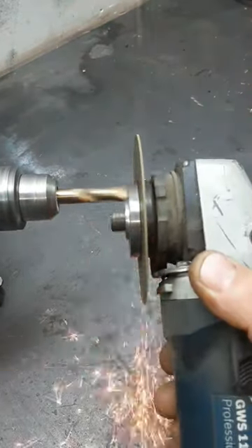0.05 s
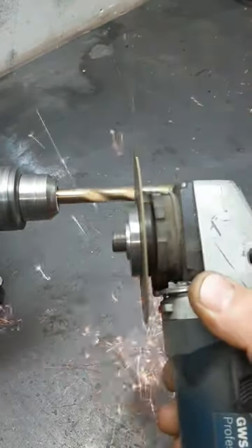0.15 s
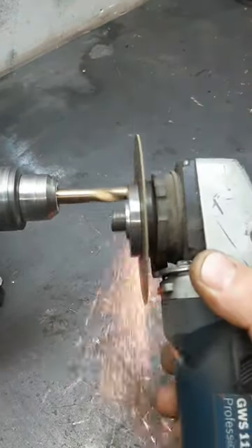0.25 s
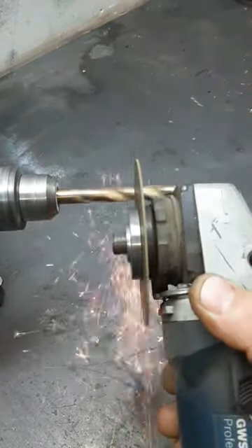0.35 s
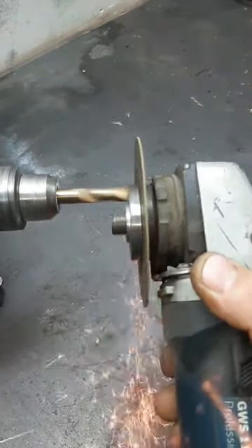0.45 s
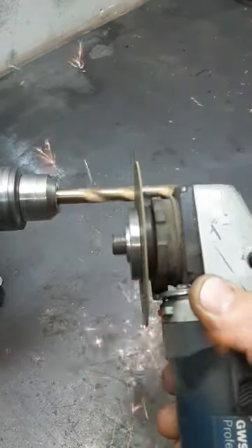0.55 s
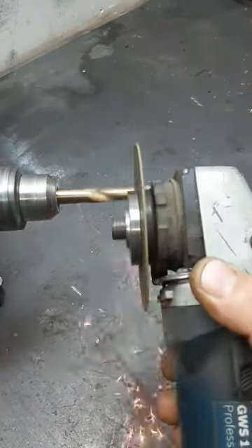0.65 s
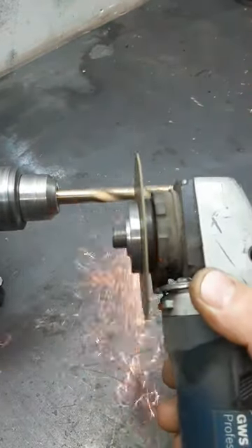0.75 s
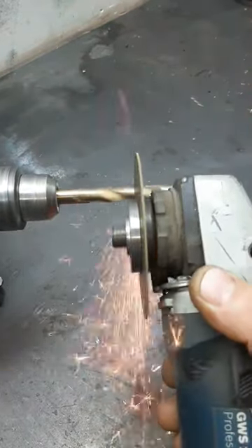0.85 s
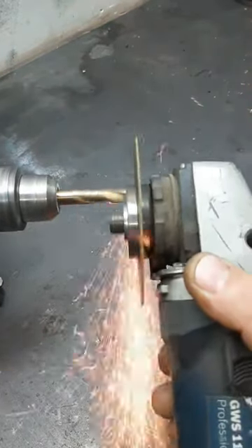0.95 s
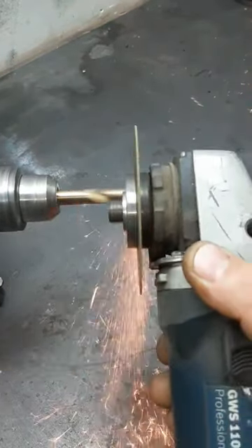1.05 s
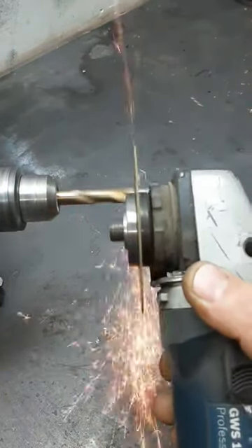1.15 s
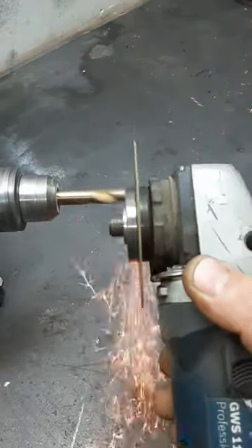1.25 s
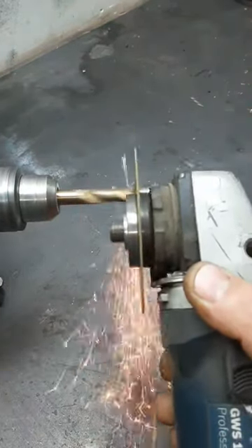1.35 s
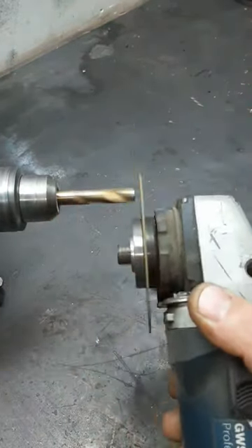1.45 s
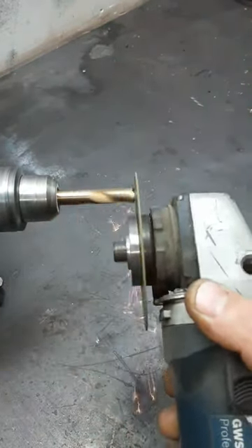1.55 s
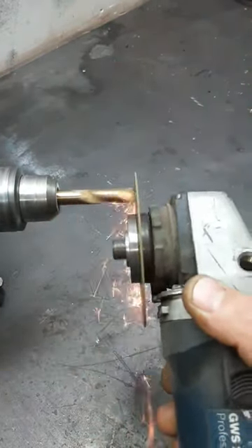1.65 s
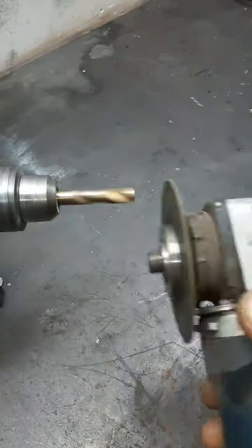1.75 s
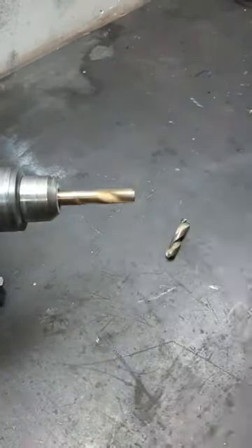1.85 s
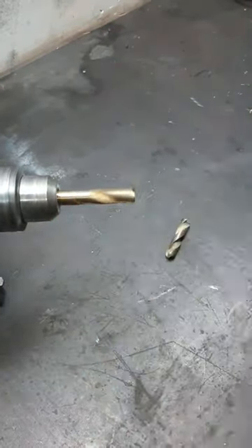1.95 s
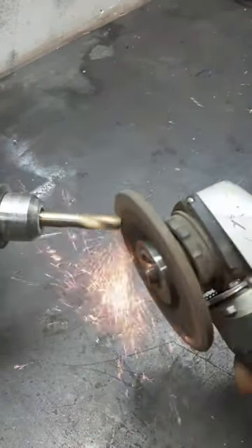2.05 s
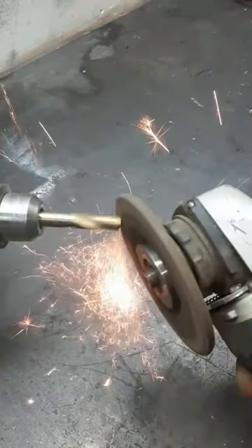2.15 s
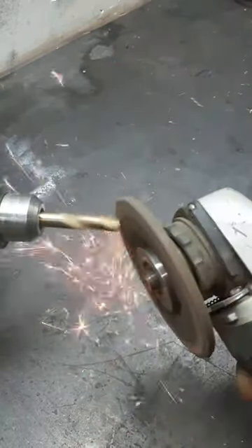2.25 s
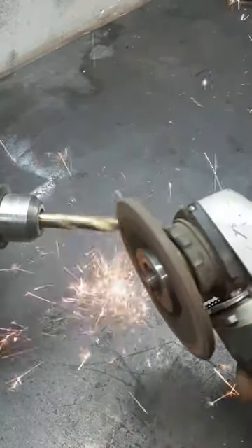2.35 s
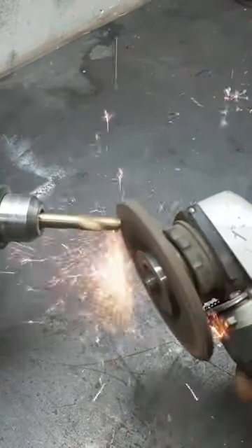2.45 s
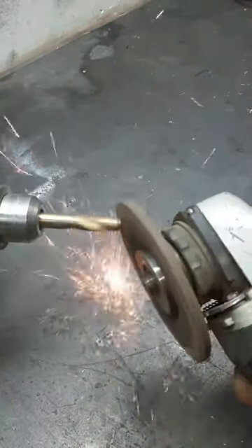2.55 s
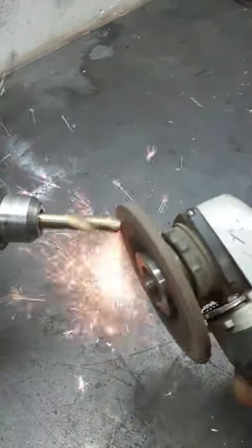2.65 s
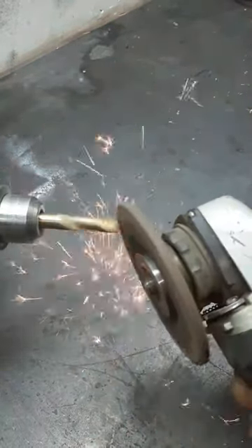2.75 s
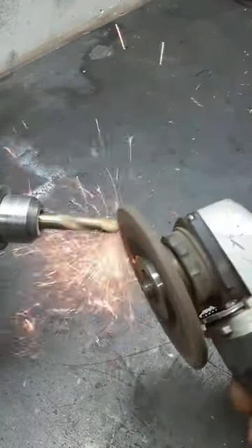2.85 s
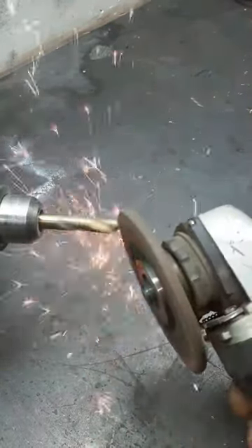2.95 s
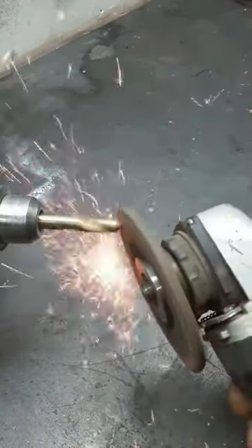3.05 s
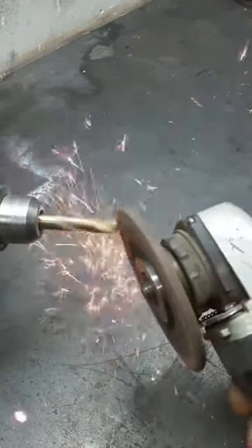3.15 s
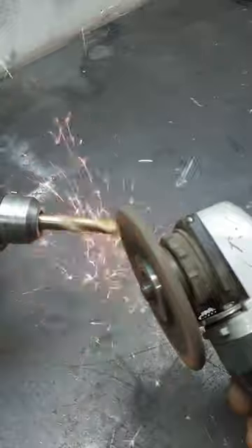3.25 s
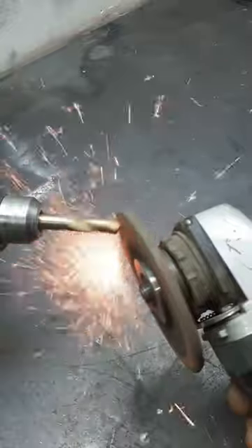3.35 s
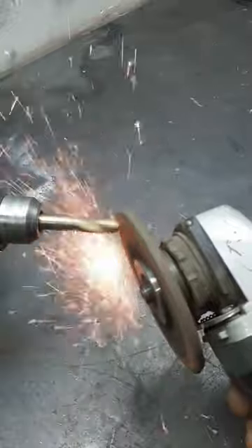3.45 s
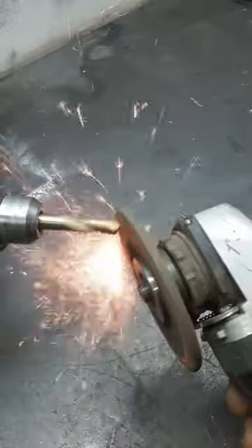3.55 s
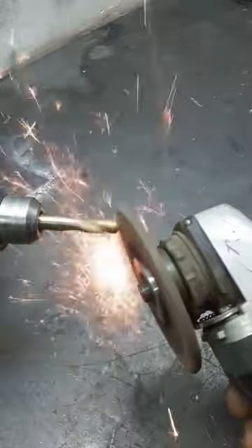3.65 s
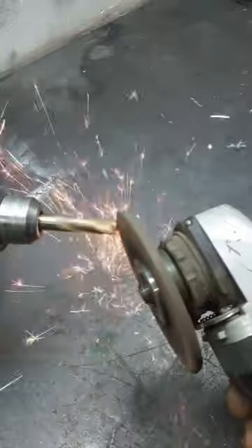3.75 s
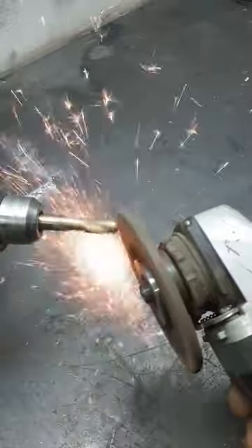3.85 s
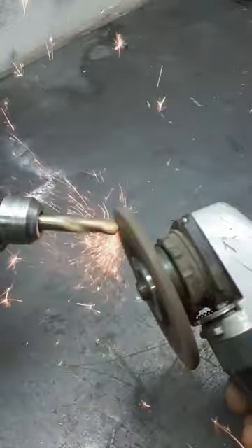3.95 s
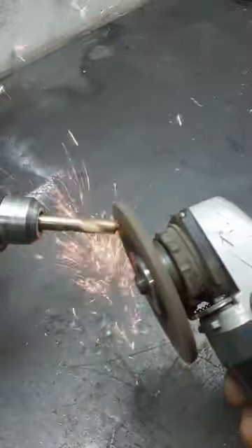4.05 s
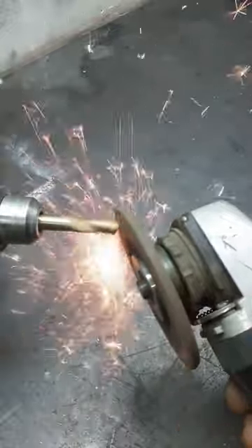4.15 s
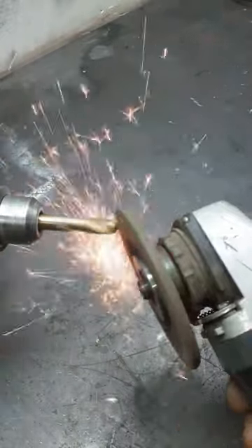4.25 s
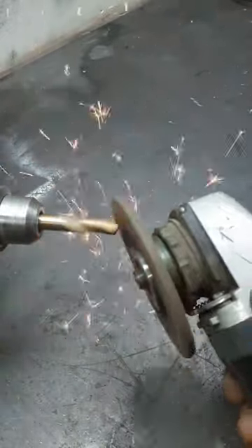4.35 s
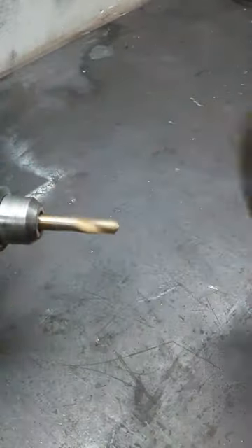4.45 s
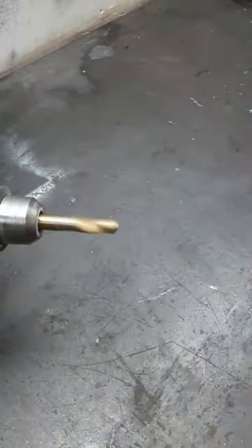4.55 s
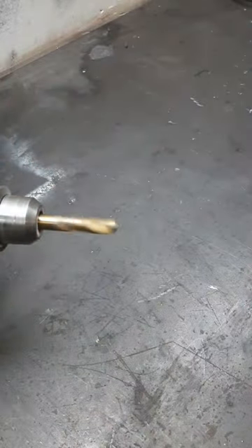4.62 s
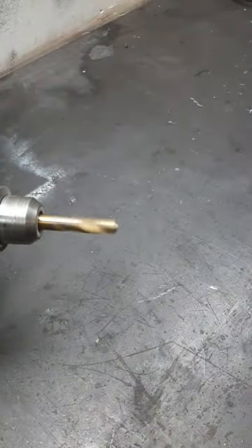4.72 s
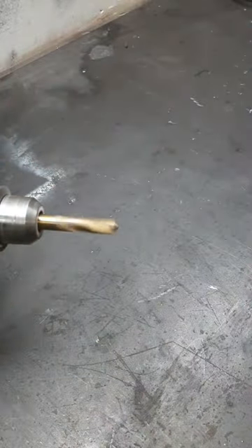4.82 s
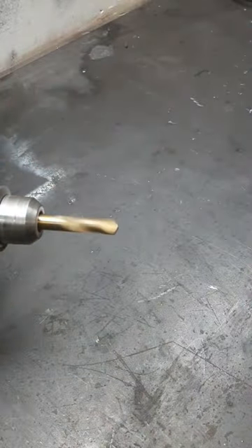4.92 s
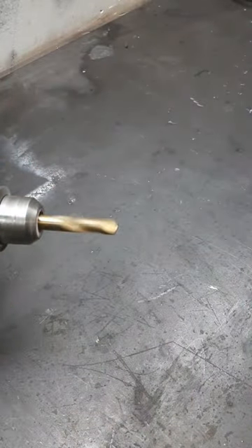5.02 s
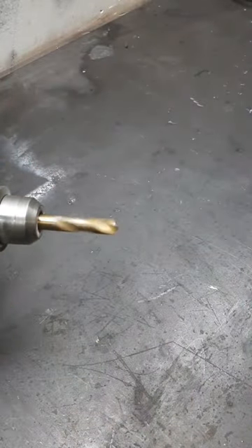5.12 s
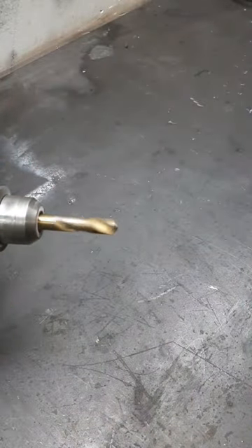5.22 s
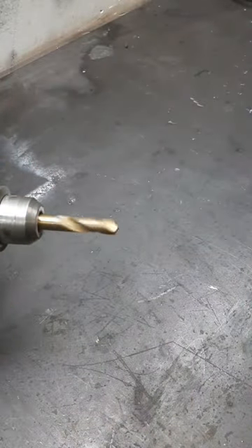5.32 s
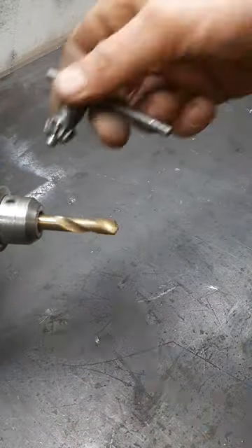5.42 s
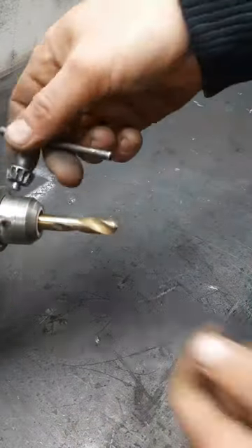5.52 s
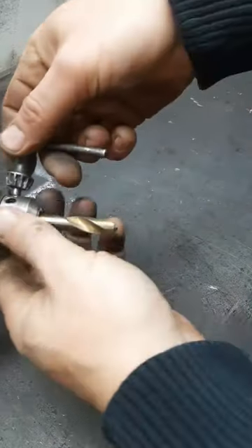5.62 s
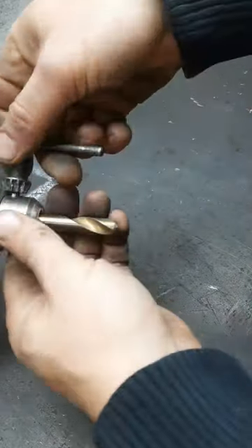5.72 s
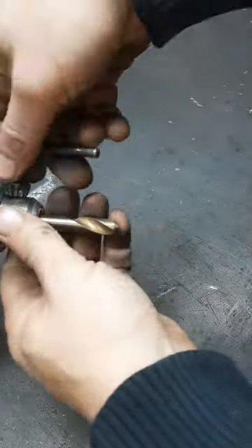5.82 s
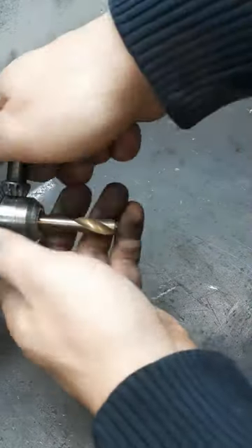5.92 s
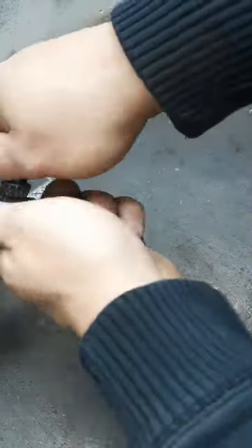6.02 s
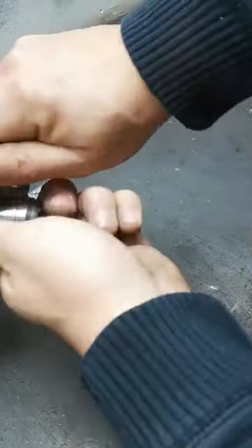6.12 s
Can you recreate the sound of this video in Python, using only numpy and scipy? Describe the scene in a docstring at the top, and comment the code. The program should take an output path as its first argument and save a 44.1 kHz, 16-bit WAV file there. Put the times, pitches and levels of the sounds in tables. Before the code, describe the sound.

A close stereo microphone catches a grinder sawing steel in separate pushes, with piercing screeches, hissing sparks and low air buffeting. After a short easing and a bump, flat grinding brings uneven roar and fluttering high squeals. The grinder cuts off abruptly, exposing a geared electric drill that speeds up, then coasts down with whine, rattle and small squeaks. Faint room noise remains beneath a few gear clicks and a soft hand rub.

```python
"""At first an angle grinder saws through a steel drill bit spinning in an electric drill: abrasive grains tear
at the steel and make it ring and screech, sparks hiss, and the disc's air blast buffets the microphone. Then
the face of the disc lands on the stub and grinds it flat, with a roar and bursts of squealing. The grinder's
sound breaks off abruptly and the drill is heard alone: its rotor speeds up, is switched off and coasts to rest
with rattle and whine. Last, its gears rasp and clack as a hand nudges the chuck."""
import sys
import numpy as np
from scipy import signal
from scipy.fft import rfft, irfft, next_fast_len
from scipy.io import wavfile

SR = 44100
rng = np.random.default_rng(int(sys.argv[2]) if len(sys.argv) > 2 else 0)


def to_wav(sig):
    """Store sig (one row per channel, or 1-D mono) as 16-bit WAV at the path in sys.argv[1].

    Samples outside -1..1 are clipped; the rate is SR.
    """
    pcm = np.clip(np.atleast_2d(sig), -1, 1) * 32767
    pcm = np.round(pcm).astype(np.int16)
    wavfile.write(sys.argv[1], SR, pcm.T)  # frames by channels


N = 272493
TIME = np.arange(N) / SR
SIZE = next_fast_len(N)
FREQS = np.maximum(np.arange(SIZE // 2 + 1) * SR / SIZE, 1)
EAR_PHASES = [[0], [np.pi / 2]]  # a quarter cycle between the two ears
# the grinder turns from the rim to the face of its disc, then its sound breaks off abruptly
TURN_S, GRINDER_END_S = 2.134, 4.651
# the drill's rotor speeds up, loses its power and comes to rest
SPEED_UP_S, POWER_OFF_S, REST_S = 4.8, 4.99, 5.835


def from_db(db):
    """Decibels to gain."""
    return 10 ** (np.asarray(db) / 20)


def in_time(rows):
    """Each column of a curve at every sample."""
    s, *columns = np.transpose(rows)
    return [np.interp(TIME, s, column) for column in columns]


def shape(points):
    """Gain at every frequency from (frequency [Hz], level [dB]) points."""
    hz, db = np.transpose(points)
    return from_db(np.interp(np.log(FREQS), np.log(hz), db))


def filtered(x, gain):
    """Apply a frequency response."""
    return irfft(rfft(x, SIZE) * gain, SIZE)[..., :N]


def unit(x):
    """Scale a stereo sound so that the average of its two sides has rms 1."""
    return x / np.sqrt(np.mean(x.mean(axis=0) ** 2) + 1e-20)


def placed(x, side):
    """Share a sound between left and right, frequency by frequency."""
    ratio = shape(side)
    return filtered(x, np.array([ratio, np.ones_like(ratio)]) * np.sqrt(2 / (1 + ratio ** 2)))


def drift(rate):
    """Smooth random wander with a spread of 1 that changes about rate times a second."""
    step, count = 32, 9000
    hz = np.arange(count // 2 + 1) * SR / step / count
    slow = irfft(rfft(rng.standard_normal(count)) / (1 + (hz / rate) ** 2))
    return np.interp(np.arange(N) / step, np.arange(count), slow / slow.std())


def held(start, end, attack_s, release_s):
    """Envelope: a straight rise, a hold, and an exponential release."""
    return np.clip((TIME - start) / attack_s, 0, 1) * np.exp(-np.maximum(TIME - end, 0) / release_s)


def swell(s, length):
    """Envelope: a bell around a moment."""
    return np.exp(-2 * np.minimum(((TIME - s) / length) ** 2, 20))


def noise():
    """Plain random noise, unrelated at the two ears."""
    return rng.standard_normal((2, N))


def hiss(spectrum):
    """Turbulence: noise with a given spectrum, unrelated at the two ears."""
    return unit(filtered(noise(), shape(spectrum)))


def tones(lines, waver_db):
    """Steady tones whose level wavers."""
    out = 0
    for hz, db in lines:
        phase = rng.uniform(0, 2 * np.pi, (2, 1))
        tone = np.sqrt(2) * np.sin(2 * np.pi * hz * TIME + phase)
        out = out + from_db(db + waver_db * drift(5.5)) * tone
    return out


def impacts(per_s, spread_db):
    """Tiny blows of uneven size at random moments; each reaches the two ears differently."""
    sizes = from_db(spread_db * np.minimum(rng.exponential(1, N), 4))
    return (rng.random(N) < per_s / SR) * sizes * noise()


def ringing(force, modes, flicker_db, flicker_rate):
    """The contact point wanders, so each mode of the steel is driven by a share of its own."""
    out = 0
    for hz, width, db in modes:
        r = np.exp(-np.pi * width / SR)
        resonance = [1, -2 * r * np.cos(2 * np.pi * hz / SR), r * r]
        drive = force * from_db(flicker_db * drift(flicker_rate))
        out = out + from_db(db) * unit(signal.lfilter([1, 0, -1], resonance, drive))
    return unit(out)


def squeal(force, modes, knee, flutter_hz, rise_hz=0):
    """Stick-slip limits its own swing, and its pitch flicks upward as the contact stiffens."""
    swing = signal.hilbert(ringing(force, modes, flicker_db=3.5, flicker_rate=32), SIZE)[:, :N]
    grip = drift(24)
    pulled_hz = flutter_hz * np.maximum(grip, 0) + rise_hz * np.abs(1 + .5 * grip)
    bend = 2 * np.pi * np.cumsum(pulled_hz) / SR
    return unit(np.real(swing * np.exp(1j * bend)) / np.sqrt(knee ** 2 + np.abs(swing) ** 2))


# tone of the quiet workshop: (frequency [Hz], relative level [dB])
ROOM = [(20, -38), (70, -5), (110, -7.5), (170, -13), (280, 0), (460, -26), (900, -25.5), (2000, -16),
        (6000, -24), (15000, -31.5)]


def room():
    """Faint steady noise of the workshop, strongest in the bass."""
    return from_db(-69.0) * hiss(ROOM)


# mains hum of the drill's motor: (frequency [Hz], relative level [dB])
HUM = [(100, -9), (300, 0)]
# its level during the grinding and alone [dB], and its change as the rotor speeds up [dB]
HUM_WORKING_DB, HUM_ALONE_DB, HUM_SINK_DB = -59, -46, -6


def mains_hum(powered):
    """The motor hums, alike at both ears, until its power is cut; the hum sinks as the rotor speeds up."""
    sink_db = np.interp(TIME, [SPEED_UP_S, POWER_OFF_S], [0, HUM_SINK_DB])
    level_db = np.where(TIME < GRINDER_END_S, HUM_WORKING_DB, HUM_ALONE_DB + sink_db)
    return from_db(level_db) * powered * tones(HUM, waver_db=1.5)[0]


RUN_HZ, TOP_HZ, COAST_DECAY_S = 193, 239.3, 1.2  # rotor speeds in turns per s


def rotor_speed():
    """Turns per second: driven up to top speed, then slowed by air drag and dry friction."""
    driven = np.interp(TIME, [SPEED_UP_S, POWER_OFF_S], [RUN_HZ, TOP_HZ])
    drag = np.exp(-np.maximum(TIME - POWER_OFF_S, 0) / COAST_DECAY_S)
    friction = np.exp(-(REST_S - POWER_OFF_S) / COAST_DECAY_S)
    return driven * np.maximum(drag - friction, 0) / (1 - friction)


# sound of the gearbox: (frequency [Hz], relative level [dB])
GEARBOX = [(20, -40), (60, -9), (150, -16.5), (300, -4.5), (450, -6), (620, -3), (1400, 0), (2300, 4),
           (3100, 5.5), (3700, 7.5), (5300, 0), (6700, 2), (7500, -3.5), (9000, -4), (14000, -44)]
# resonances of the drill's housing: (frequency [Hz], width [Hz], level above the gear noise [dB])
HOUSING = [(303, 66, 4.5), (644, 140, 8.5), (934, 56, 9), (1035, 70, 10.5), (2058, 81, 9.5),
           (2270, 63, -0.5), (2830, 38, 7), (3600, 130, 0), (4330, 60, 0), (6900, 830, 8.5)]


def housing(knocks):
    """Teeth knock through their backlash and sound the drill's housing."""
    peaks = 0
    for hz, width, db in HOUSING:
        peaks = peaks + from_db(db) ** 2 / (1 + (2 * (FREQS - hz) / width) ** 2)
    return unit(filtered(knocks, shape(GEARBOX) * np.sqrt(1 + peaks)))


def tooth_pattern(turn, count=40):
    """Flaws of the teeth repeat with every turn of the rotor: a comb of tones that glides with the speed."""
    size = 1024
    orders = rng.standard_normal((2, count)) + 1j * rng.standard_normal((2, count))
    patterns = irfft(orders * (np.arange(count) > 6), size)  # leave out the lowest tones
    angles = np.arange(size) * 2 * np.pi / size
    return unit(np.array([np.interp(turn, angles, p, period=2 * np.pi) for p in patterns]))


def rattle(turn, pace, powered):
    """Random tooth knocks and the repeating tooth pattern shake the housing together."""
    # the load shifts between the two flanks of the teeth
    flank = 1.27 * drift(5.6)
    mesh = np.cos(flank) * tooth_pattern(turn) + np.sin(flank) * tooth_pattern(turn)
    knocks = unit(impacts(per_s=30000, spread_db=0.5)) * from_db(0.67 * drift(37))
    # the gears sing more clearly once they coast
    mesh_share = .46 - .2 * powered
    return housing(knocks + mesh_share * mesh * np.sqrt(pace))


# gear tones: (multiple of the rotor speed, level while driven [dB re rattle], while coasting [dB re rattle])
WHINE = [(3, -29, -29), (11, -27, -26), (12, -20.5, -26), (13, -28, -17.5), (22, -26, -23),
         (26, -28, -15.5), (30, -22, -22), (39, -28, -14.5)]


def whine(turn, powered):
    """Each gear tone follows a multiple of the rotor speed and wavers in level."""
    out = 0
    for multiple, driven_db, coast_db in WHINE:
        level_db = coast_db + (driven_db - coast_db) * powered + 4 * drift(24)
        out = out + from_db(level_db) * np.sin(multiple * turn + rng.uniform(0, 2 * np.pi, (2, 1)))
    return out


# the unbalanced rotor shakes the drill most at certain speeds:
# (rotor speed [turns per s], level before the 4.5 dB cut below [dB])
SHAKE = [(50, -72), (72, -52.5), (92, -46), (112, -65.5), (135, -74), (165, -58), (195, -50), (215, -45),
         (237, -47)]


def shake(speed, turn):
    """Imbalance makes one low swing per turn, strongest at the speeds where the drill resonates."""
    level_db = np.interp(speed, *np.transpose(SHAKE)) - 4.5 + 3.5 * drift(40)
    return from_db(level_db) * np.sqrt(2) * np.sin(turn + .5 * drift(40) + EAR_PHASES)


def chuck():
    """The chuck rings for a while: noise swells and fades through three resonances."""
    modes = [(2054, 35, -1.0), (2190, 120, -4), (915, 75, -6.5)]
    return from_db(-30.5) * swell(4.87, .29) * ringing(noise(), modes, flicker_db=4.0, flicker_rate=11)


def shrill(pace):
    """The gears turn shrill near top speed."""
    return from_db(-36) * pace ** 14 * ringing(noise(), [(7170, 380, 0)], flicker_db=3.0, flicker_rate=18)


# hiss of the carbon brushes, and also of the grinding sparks: (frequency [Hz], relative level [dB])
SPARK_HISS = [(3000, -19), (7000, -24), (9800, -3), (10700, 0.5), (13500, 2.5), (15000, 2), (16000, -4)]


def brushes(pace):
    """The hiss of the carbon brushes fades faster than the gears."""
    return from_db(-37.0) * pace ** 1.08 * hiss(SPARK_HISS)


# squeaks of the drill: (time [s], length [s], frequency at that time [Hz], level [dB])
SQUEAKS = [(4.7, .07, 5460, -34), (4.99, .025, 7150, -26), (5.055, .025, 7070, -24.5),
           (5.115, 0.027, 4270, -28.5), (5.44, .02, 3670, -32)]
SQUEAK_FALL_HZ_PER_S, SQUEAK_JITTER_HZ = 1200, 60


def squeaks():
    """Brief, slightly falling, unsteady squeaks, as gear tones pass the drill's resonances."""
    out = 0
    for s, length, hz, db in SQUEAKS:
        pitch = hz - SQUEAK_FALL_HZ_PER_S * (TIME - s) + SQUEAK_JITTER_HZ * drift(120)
        tone = np.sqrt(2) * np.sin(2 * np.pi * np.cumsum(pitch) / SR + EAR_PHASES)
        out = out + from_db(db) * swell(s, length) * tone
    return out


# gears: level coasting at full pace, gain while the motor drives them, level under the grinder
RATTLE_DB, DRIVEN_DB, DRILL_WORKING_DB = -28, 2, -10.5
RATTLE_LAW, SETTLE_S = 0.47, 0.14  # power law in speed; fade in the last turns


def drill():
    """Gear rattle, whine and shake follow the rotor; the mains hum ends when the power is cut."""
    speed = rotor_speed()
    pace = speed / speed.max()
    powered = held(0, POWER_OFF_S, attack_s=0.0098, release_s=0.028)
    # backlash makes the speed jitter, and under power it also wanders slowly
    unsteady = 1 + .006 * drift(45) + .012 * powered * drift(2)
    turn = 2 * np.pi * np.cumsum(speed * unsteady) / SR
    gear_level = from_db(RATTLE_DB + DRIVEN_DB * powered) * pace ** RATTLE_LAW
    gears = gear_level * (rattle(turn, pace, powered) + whine(turn, powered) * np.clip(speed / 90, 0, 1))
    running = (TIME >= GRINDER_END_S) * np.clip((REST_S - TIME) / SETTLE_S, 0, 1)
    # under the grinder only the hum and fainter gears are heard
    working = from_db(DRILL_WORKING_DB) * (TIME < GRINDER_END_S)
    alone = gears + shake(speed, turn) + chuck() + shrill(pace) + squeaks() + brushes(pace)
    return mains_hum(powered) + working * gears + running * alone


# thud of the drill's body: (frequency [Hz], relative level [dB])
THUD = [(100, -38), (200, -3), (265, 4), (310, -1), (355, 14.5), (440, -28), (800, -39)]
# gears rasp and clack: (time [s], length setting [s], teeth level before dulling [dB],
# dull above [Hz], thud level [dB])
RASPS = [(4.678, 0.0031, -21, 12500, -45), (5.723, 0.014, -38, 10020, -58), (5.766, 0.026, -38, 3000, -53),
         (5.806, 0.0062, -60, 3000, -47), (5.894, 0.01, -43, 7500, -48.5),
         (5.968, 0.0092, -54.5, 4500, -77), (5.999, .005, -65, 6000, -67), (6.135, 0.0083, -40, 9100, -72),
         (6.16, 0.0094, -48, 7000, -55)]
# a rasp catches quickly and runs out more slowly (shares of its length setting, doubled below)
RASP_RISE, RASP_FALL = 0.87, 1.23


def rasps():
    """Short turns of the chuck drag the gear teeth over each other and jog the drill's body."""
    teeth = housing(impacts(per_s=26000, spread_db=3.0))
    body = hiss(THUD)
    out = 0
    for s, length, db, dull_hz, thud_db in RASPS:
        stroke = swell(s, 2 * length * np.where(TIME < s, RASP_RISE, RASP_FALL))
        dull = signal.butter(2, min(dull_hz, SR / 2 - 1), fs=SR, output="sos")
        out = out + stroke * (from_db(db) * signal.sosfilt(dull, teeth) + from_db(thud_db) * body)
    return out


# skin sliding on the chuck: (frequency [Hz], relative level [dB])
SKIN = [(100, -6), (300, 6), (850, -20), (1600, -3), (3000, -1), (7000, -2), (10000, -8), (12500, 5),
        (15000, 0.5)]


def hand():
    """A hand brushes the chuck: one soft swell of hiss."""
    return from_db(-60.5) * swell(6.085, .076) * hiss(SKIN)


# the landing disc, then the hand, bumps the drill: (time [s], frequency [Hz], decay [s], level [dB])
BUMPS = [(2.143, 85, .018, -17), (6.03, 68, .03, -58)]


def bumps():
    """Each bump sets the drill rocking for a few cycles."""
    out = 0
    for s, hz, decay_s, db in BUMPS:
        rocking = np.sin(2 * np.pi * hz * (TIME - s) + EAR_PHASES)
        out = out + from_db(db) * held(s, s, 0.0045, decay_s) * rocking
    return out


# level of the grinder's motor and fan: (time [s], level [dB])
GRINDER_LEVEL = [(0, -29), (.95, -28), (1.65, -28.5), (1.95, -26.5), (2.12, -28.5), (2.2, -28.5),
                 (4.4, -29.5), (4.64, -22)]
# rush of the fan: (frequency [Hz], relative level [dB])
FAN = [(60, -21), (140, -9), (300, -18), (800, -15.5), (1400, -3.5), (2200, 3.5), (3000, 5.5), (3800, 7),
       (5000, 2), (6200, 2), (7300, 2.5), (9000, -21), (12000, -1.5), (15000, -16.5)]
# hum of the disc while the steel bears fully on it: (frequency [Hz], level [dB])
DISC_HUM = [(174.5, -52), (349, -55), (526, -57), (700, -57)]
DISC_FREE_DB, DISC_WAVER_DB = -17, 2.5  # change when it spins free; unsteadiness


def motor(touch):
    """The fan rushes all the time; the disc hums mainly while the steel bears on it."""
    rush = from_db(in_time(GRINDER_LEVEL)[0]) * hiss(FAN)
    return rush + np.maximum(touch, from_db(DISC_FREE_DB)) * tones(DISC_HUM, DISC_WAVER_DB)


# the disc snags for a moment: (time [s], length [s], extra load [dB], extra air blast [dB])
SNAGS = [(0.47, 0.0067, 10, -5.5), (1.594, 0.017, 5, 2), (2.144, 0.018, 1, 3.5), (2.35, .025, 2.5, 2.5),
         (2.469, .02, 1, -1), (2.752, 0.033, 4.5, 3), (2.819, 0.013, 6.5, 8), (3.028, 0.022, 6, 4.5),
         (3.1, 0.096, 2.5, 5.5), (3.502, 0.034, 3.5, -1), (3.675, 0.037, 7, 3), (3.884, 0.024, 7, 1.5),
         (3.975, 0.049, 4.5, 5.5), (4.158, .018, 5, 3), (4.2, 0.024, 5, 4.5), (4.274, 0.034, 7, 5),
         (4.42, .02, 2.5, -4)]


def snags_db():
    """Extra load, heard as roar, and extra air blast in dB while the disc snags."""
    return sum(np.outer([load_db, blast_db], swell(s, length)) for s, length, load_db, blast_db in SNAGS)


# the rim is pushed into the bit: (start [s], end [s], load at the start [dB],
# change of load [dB per s], sparks [dB])
PUSHES = [(0.0, 1.0, 0, -10.5, -30.5), (1.01, 1.61, -8.5, 0.5, -28), (1.728, 1.9, -8, -6, -29.5)]
PUSH_ATTACK_S, PUSH_RELEASE_S = 0.018, 0.011
SPARKS_RELEASE_S = .05  # sparks fly on for a moment after a push
GRAZE_SPARKS_DB = -37.5  # between pushes the rim only grazes
EASE_IN_DB, EASE_IN_S = -4, .05  # the first push takes a moment to bear down fully
HAND_WOBBLE_DB = .5  # unsteadiness of the hand that holds the grinder


def rim_contact():
    """Load on the rim and the sparks it throws, as gains: the load drifts during each push."""
    load, sparks = 0, 0
    for start, end, load_db, db_per_s, sparks_db in PUSHES:
        push = held(start, end, PUSH_ATTACK_S, PUSH_RELEASE_S)
        easing_db = db_per_s * np.clip(TIME - start, 0, end - start)
        load = np.maximum(load, push * from_db(load_db + easing_db))
        flying = held(start, end, PUSH_ATTACK_S, SPARKS_RELEASE_S)
        sparks = np.maximum(sparks, flying * from_db(sparks_db))
    ease_in_db = EASE_IN_DB * np.exp(-TIME / EASE_IN_S)
    load = load * from_db(snags_db()[0] + ease_in_db + HAND_WOBBLE_DB * drift(5.7))
    return load, np.hypot(sparks, from_db(GRAZE_SPARKS_DB) * (TIME < TURN_S))


DISC_HZ, BUZZ_DB = 174.5, 2.2  # average turns per s; swing of the buzz


def bite(disc_hz, runout_db):
    """Contact force: the disc is slightly out of round and bites harder once a turn."""
    turns = np.cumsum(disc_hz * (1 + .008 * drift(1.6))) / SR
    force = from_db(runout_db * np.sin(2 * np.pi * turns))
    return force / np.sqrt(np.mean(force ** 2))


# two bending modes of the bit screech when the cut pinches:
# (start [s], end [s], lower level at the start [dB], upper level at the start [dB], fading [dB per s])
PINCHES = [(0.026, .62, -33.5, -46, 1), (1.008, 1.56, -27, -32.5, 3), (1.712, 1.9, -40, -30, 6)]
PINCH_ATTACK_S, PINCH_RELEASE_S = 0.011, 0.029


def pinching():
    """Gains of the lower and the upper screech."""
    lower, upper = 0, 0
    for start, end, low_db, high_db, fade_db_per_s in PINCHES:
        fade = from_db(-fade_db_per_s * np.clip(TIME - start, 0, end - start))
        pinch = held(start, end, PINCH_ATTACK_S, PINCH_RELEASE_S) * fade
        lower = np.hypot(lower, from_db(low_db) * pinch)
        upper = np.hypot(upper, from_db(high_db) * pinch)
    return lower, upper


# scrape of the rim: (frequency [Hz], relative level [dB])
CUT_SCRAPE = [(100, -8.5), (300, 5), (900, 3), (1500, 3), (2600, 0.5), (4000, -10.5), (5400, -1),
              (6200, -22), (7400, -29), (8100, -9), (10000, -11), (12000, -11)]
# resonances of the whole bit: (frequency [Hz], width [Hz], relative level [dB])
BIT_MODES = [(1215, 27, -7), (1545, 65, -2), (2062, 50, -1.5), (3800, 160, -2), (4170, 50, 1),
             (4725, 60, -4), (4900, 60, -3), (5060, 50, -3), (5420, 70, -4.5)]
# a pinch also rasps in the modes around the screeches: (frequency [Hz], width [Hz], relative level [dB])
PINCH_MODES = [(3325, 35, -1), (3640, 60, 2), (3870, 60, -3), (4060, 40, -3), (4240, 45, 0), (4400, 90, -3),
               (5255, 60, -6)]
# the two screeches of the pinched bit: (frequency [Hz], width [Hz], relative level [dB])
LOW_SCREECH = [(3495, 24, 4), (3520, 80, -3)]
HIGH_SCREECH = [(4735, 35, 0), (4905, 35, -5), (5080, 70, -15)]
# scrape at full load and while grazing, ring while attached, and pinch rasp relative to the lower screech
CUT_SCRAPE_DB, GRAZE_SCRAPE_DB, CUT_RING_DB, PINCH_RING_DB = -26.5, -45.5, -35.5, -5


def cutting(force, load):
    """The rim saws into the long bit, which rings and screeches."""
    grains = force * impacts(per_s=26000, spread_db=2.0)
    scrape_level = np.hypot(from_db(CUT_SCRAPE_DB) * load, from_db(GRAZE_SCRAPE_DB))
    scrape = scrape_level * unit(filtered(grains, shape(CUT_SCRAPE)))
    # the bit rings as long as the rim touches it, more weakly as the tip drops off
    attached = np.interp(TIME, [1.9, 2.0], [1, .7])
    ring = attached * from_db(CUT_RING_DB) * ringing(grains, BIT_MODES, flicker_db=5.0, flicker_rate=13)
    lower, upper = pinching()
    rasp = from_db(PINCH_RING_DB) * lower * ringing(grains, PINCH_MODES, flicker_db=1.5, flicker_rate=23)
    low = lower * squeal(grains, LOW_SCREECH, knee=3.0, flutter_hz=8.04)
    high = upper * squeal(grains, HIGH_SCREECH, knee=2.4, flutter_hz=7.45)
    screech = (low + high) * bite(DISC_HZ, BUZZ_DB)  # buzzes once a turn
    # a light touch draws a thinner squeal, which swells up and lasts until the next push
    thin_level = from_db(-36) * held(0.5, 1.0, attack_s=0.17, release_s=.005)
    thin = thin_level * squeal(grains, [(5200, 95, 0)], knee=3.5, flutter_hz=30)
    return (scrape + ring + rasp + screech + thin) * (TIME < TURN_S)


# scrape of the disc's face: (frequency [Hz], relative level [dB])
FACE_SCRAPE = [(100, -7), (300, -8), (800, -6), (1300, -6.5), (1800, -5), (2400, -3.5), (3600, -3),
               (4500, -2), (5600, 4.5), (6300, -3.5), (8100, -0.5), (9500, -5), (12000, -54)]
# low roar of the face chattering on the stub: (frequency [Hz], relative level [dB])
ROAR = [(80, -17), (250, -0.5), (500, -1), (900, -3.5), (1400, -1), (2200, -16.5), (5000, -39)]
# resonances of the stub: (frequency [Hz], width [Hz], relative level [dB])
STUB_MODES = [(1550, 110, -4.5), (2045, 60, -7.5), (3103, 60, -3.5), (3530, 200, -5), (4180, 30, -8),
              (6920, 35, -8), (8130, 70, -11), (9900, 120, -13), (11580, 150, -8.5)]
# lower and upper squeal of the stub: (frequency [Hz], width [Hz], relative level [dB])
LOW_SQUEAL = [(5190, 30, 6), (5215, 70, -3), (5290, 210, -11)]
HIGH_SQUEAL = [(6760, 53, 3), (6580, 98, -8)]
# bursts of the lower squeal, pulled up in pitch by a tightening grip:
# (time [s], length [s], level [dB], typical rise [Hz])
SQUEALS = [(2.19, .05, -31, 0), (2.265, .07, -30, 110), (2.32, .035, -28.5, 20), (2.43, .15, -30.5, 0),
           (2.52, .05, -28, 15), (2.59, .035, -31, 110), (2.72, .055, -30, 0), (2.8, .04, -28.5, 70),
           (2.855, .035, -32, 80), (2.965, .035, -33, 80), (3.05, .05, -34, 170), (3.11, .04, -32, 20),
           (3.17, .04, -32, 260), (3.24, .04, -29.5, 80), (3.3, .06, -27.5, 170), (3.345, .04, -30.5, 20),
           (3.46, .1, -31, 75), (3.555, .06, -29.5, 80), (3.713, .05, -30.5, 90), (3.84, .04, -31, 180),
           (3.885, .045, -30, 30), (3.96, .05, -34, 170), (4.12, .035, -32.5, 70), (4.236, .06, -28, 5),
           (4.35, .11, -30, 10), (4.49, .074, -29.5, 50)]
# the upper squeal lapses: (time [s], length [s], change of level [dB])
LAPSES = [(2.748, 0.035, -8), (3.17, 0.098, -14)]
FACE_SCRAPE_DB, FACE_RING_DB, ROAR_DB = -27.5, -31.5, -34  # at a load of 0 dB
SCRAPE_FOLLOWS, CHATTER_DB = 0.32, 0.3  # share of the load's swing in the scrape; swing of the chatter
LOW_SQUEAL_DB, HIGH_SQUEAL_DB = -38.5, -34  # lower between bursts; upper between lapses
FACE_END_S, FACE_ATTACK_S, FACE_RELEASE_S = 4.52, .006, 0.088


def facing(force, load_db):
    """The face of the disc rubs the short stub, which roars under load and squeals higher and in bursts."""
    grains = force * impacts(per_s=20000, spread_db=1.3)
    scrape_level = from_db(FACE_SCRAPE_DB + SCRAPE_FOLLOWS * load_db)
    scrape = scrape_level * unit(filtered(grains, shape(FACE_SCRAPE)))
    chatter = force * impacts(per_s=5000, spread_db=1.0)
    roar_level = from_db(ROAR_DB + load_db + CHATTER_DB * drift(30))
    roar = roar_level * unit(filtered(chatter, shape(ROAR)))
    ring_level = from_db(FACE_RING_DB + .5 * load_db)
    ring = ring_level * ringing(grains, STUB_MODES, flicker_db=4.0, flicker_rate=18)
    bursts = sum(from_db(db) * swell(s, length) for s, length, db, rise in SQUEALS)
    rise_hz = sum(rise * swell(s, length) for s, length, db, rise in SQUEALS)
    low_level = np.hypot(bursts, from_db(LOW_SQUEAL_DB))
    low = low_level * squeal(grains, LOW_SQUEAL, knee=1.5, flutter_hz=20, rise_hz=rise_hz)
    lapse_db = sum(db * swell(s, length) for s, length, db in LAPSES)
    # the upper squeal wavers by itself
    high_level = from_db(HIGH_SQUEAL_DB + lapse_db + 2 * drift(25))
    high = high_level * squeal(grains, HIGH_SQUEAL, knee=0.99, flutter_hz=25.24)
    touching = held(TURN_S, FACE_END_S, FACE_ATTACK_S, FACE_RELEASE_S)
    return (scrape + roar + ring + low + high) * touching


FACE_SPARKS_DB = -28  # when the stub is hot and the load is 0 dB
COLD_SPARKS_DB, HEATING_S = -5.5, 0.96  # the sparks build up as the stub heats


def sparks(force, rim_sparks, stream):
    """Sparks crackle so densely that they hiss."""
    cold_db = COLD_SPARKS_DB * np.exp(-np.maximum(TIME - TURN_S, 0) / HEATING_S)
    level = rim_sparks + from_db(FACE_SPARKS_DB + cold_db) * stream
    return level * unit(filtered(force * impacts(per_s=30000, spread_db=0.0), shape(SPARK_HISS)))


# air blast of the disc at the microphone: (frequency [Hz], relative level [dB])
BLAST = [(15, -30), (30, -14.5), (65, -0.5), (115, -2.5), (200, -4.5), (350, -15), (800, -33),
         (2000, -58.5)]
CUT_BLAST_DB, FACE_BLAST_DB, BUFFET_DB = -34.5, -36, 2.2  # at a load of 0 dB; lumpiness


def air_blast(rim_load, stream, snag_db):
    """Air flung off by the disc buffets the microphone in lumps."""
    level = from_db(CUT_BLAST_DB) * rim_load + from_db(FACE_BLAST_DB) * stream
    return level * from_db(snag_db + BUFFET_DB * drift(28)) * hiss(BLAST)


# how hard the face is pressed on the stub: (time [s], load [dB])
FACE_LOAD = [(2.15, 1.5), (2.21, -2), (2.27, -8), (2.35, 0), (2.55, -1), (2.65, -1.5), (3.1, -1),
             (3.45, -1.5), (3.8, -3.5), (4.25, -2), (4.34, -10.5), (4.43, -0.5), (4.52, -4)]
# balance of the grinder: (frequency [Hz], left minus right [dB])
GRINDER_SIDE = [(60, -1), (300, -2.5), (900, -3.5), (2300, -2), (3600, -6.5), (5200, -4.5), (7000, -4),
                (8200, -0.5), (14000, -2)]
STREAM_FOLLOWS, STREAM_RELEASE_S = 0.5, 0.017  # share of the load's swing in the blast and sparks


def grinder():
    """Fan rush and disc hum, grinding contact, and the spark stream and lumpy air blast."""
    force = from_db(1.0 * drift(28))  # the disc judders on the spinning bit
    snag_load_db, snag_blast_db = snags_db()
    rim_load, rim_sparks = rim_contact()
    face_db = in_time(FACE_LOAD)[0] + HAND_WOBBLE_DB * drift(6.5)
    pressed = held(TURN_S, FACE_END_S, FACE_ATTACK_S, STREAM_RELEASE_S)
    stream = from_db(STREAM_FOLLOWS * face_db) * pressed
    contact = cutting(force, rim_load) + facing(force, face_db + snag_load_db)
    flung = sparks(force, rim_sparks, stream) + air_blast(rim_load, stream, snag_blast_db)
    whole = motor(np.sqrt(rim_load) + stream) + contact + flung
    return placed(whole, GRINDER_SIDE) * (TIME < GRINDER_END_S)


# balance of the drill and the hand: (frequency [Hz], left minus right [dB])
DRILL_SIDE = [(60, -14), (110, 12), (200, -6), (380, -0.5), (700, -4.5), (1290, -3), (2380, -3.5),
              (4400, -9), (8120, -6), (15000, 1)]


def scene():
    """The quiet workshop, the drill with the hand on it, and the grinder."""
    return room() + placed(drill() + rasps() + hand(), DRILL_SIDE) + bumps() + grinder()


# the level dips briefly and swells back: (time [s], change of level [dB])
DIPS = [(.997, -15), (2.13, -19), (4.647, -19)]
CUTOFF_HZ = 15300


def record(dry):
    """Three brief dips in level, a dip in the treble around 9 kHz, and a cut top."""
    dip_db = 0
    for s, depth_db in DIPS:
        drop = np.clip((TIME - s) / 0.0033 + .5, 0, 1)
        recovery = np.clip((s + 0.017 - TIME) / 0.0091, 0, 1)
        dip_db = dip_db + depth_db * drop * recovery
    notch_hz, notch_width_hz, notch_db = 8850, 480, -26
    colour = from_db(notch_db * np.exp(-((FREQS - notch_hz) / notch_width_hz) ** 2))
    top = 1 / np.sqrt(1 + (FREQS / CUTOFF_HZ) ** 400)
    return filtered(dry * from_db(dip_db), colour * top)


dry = scene()
out = record(dry)
to_wav(out)
```